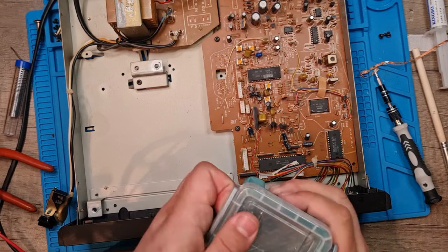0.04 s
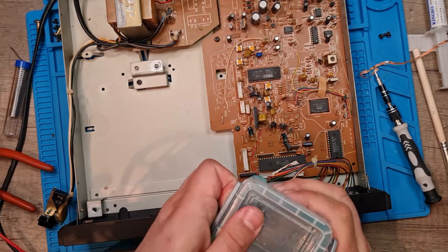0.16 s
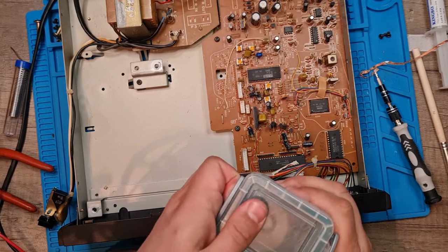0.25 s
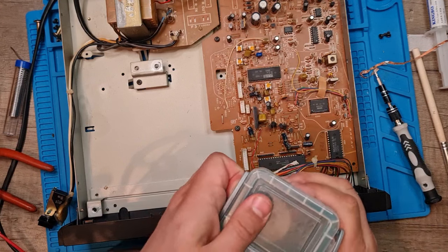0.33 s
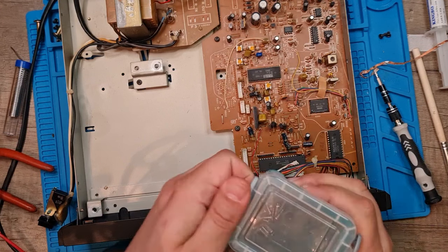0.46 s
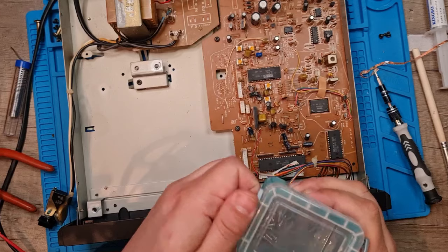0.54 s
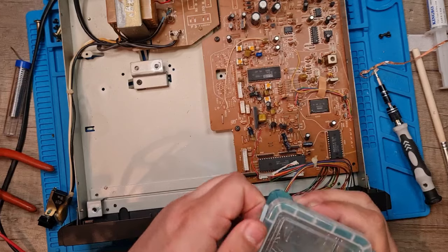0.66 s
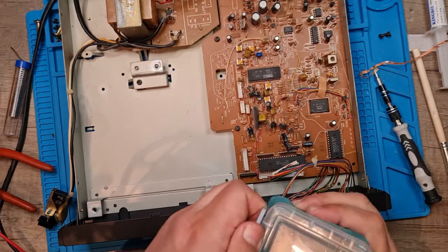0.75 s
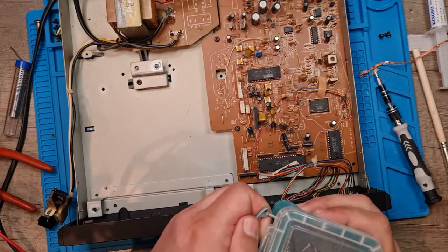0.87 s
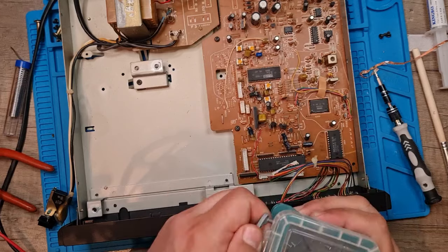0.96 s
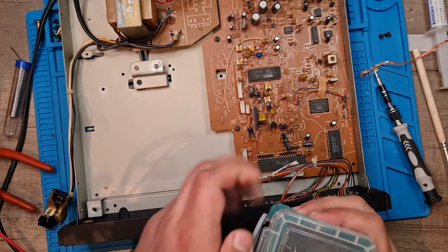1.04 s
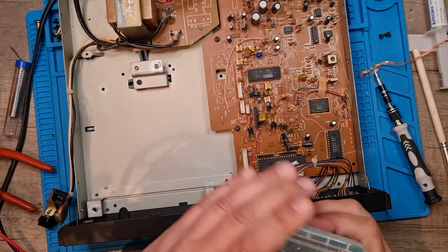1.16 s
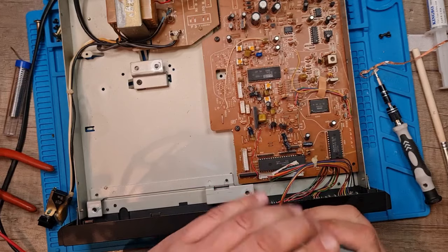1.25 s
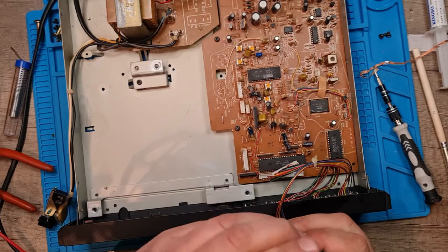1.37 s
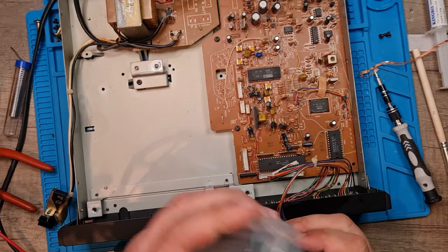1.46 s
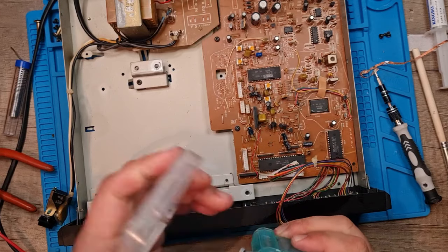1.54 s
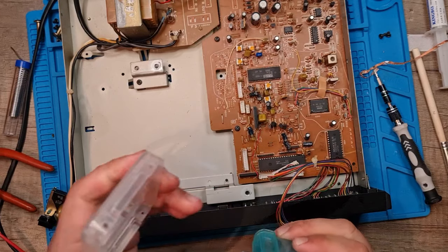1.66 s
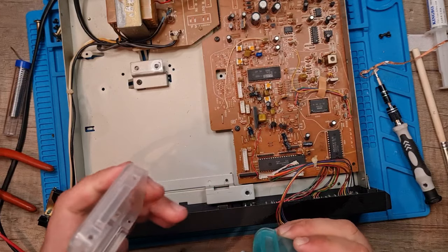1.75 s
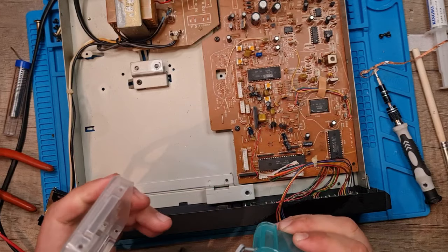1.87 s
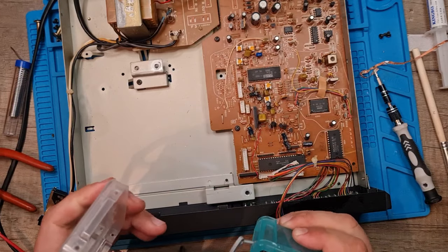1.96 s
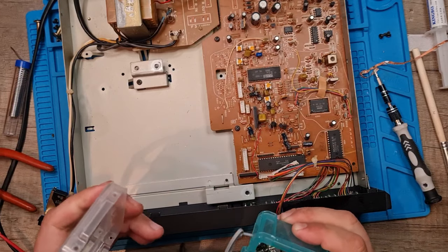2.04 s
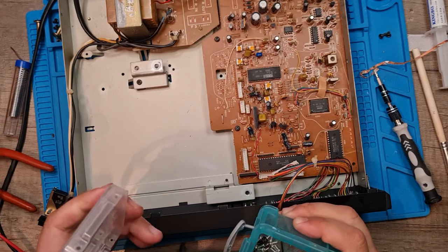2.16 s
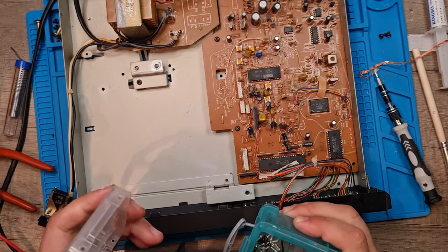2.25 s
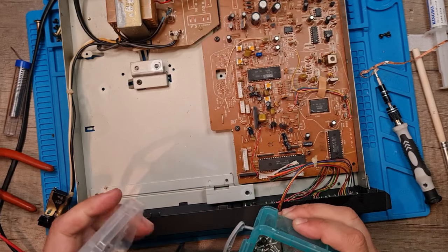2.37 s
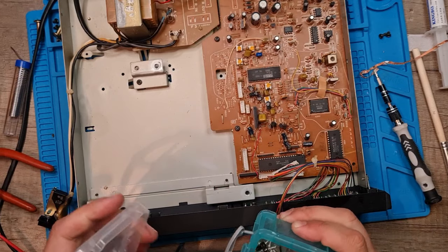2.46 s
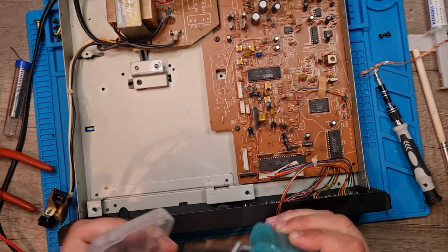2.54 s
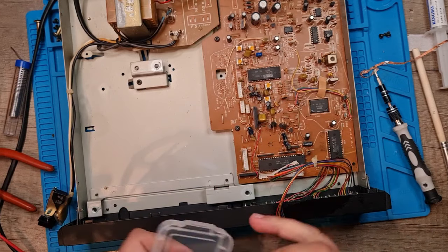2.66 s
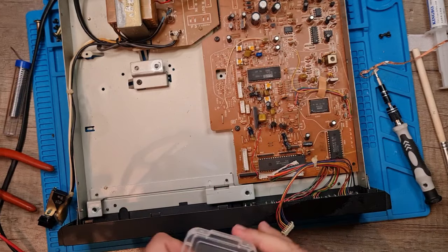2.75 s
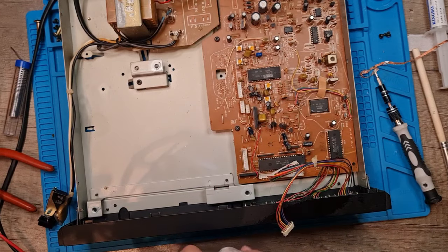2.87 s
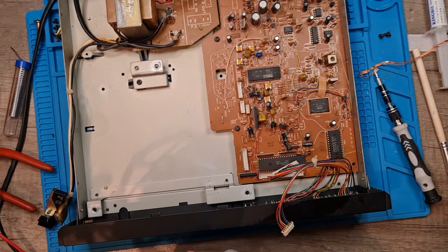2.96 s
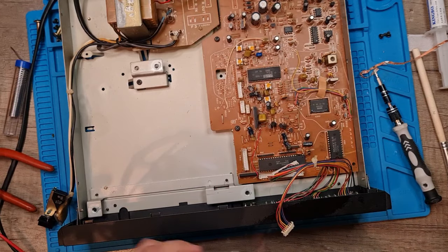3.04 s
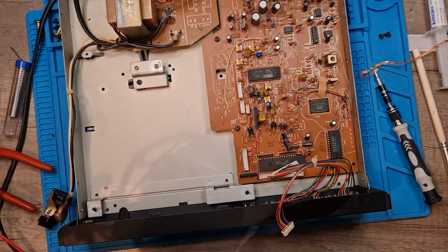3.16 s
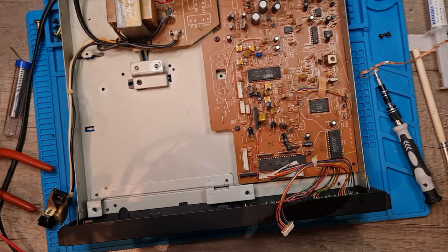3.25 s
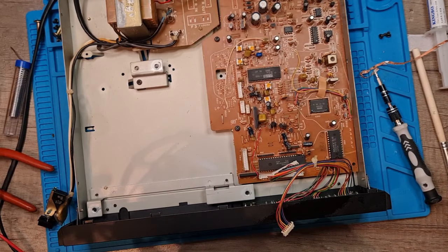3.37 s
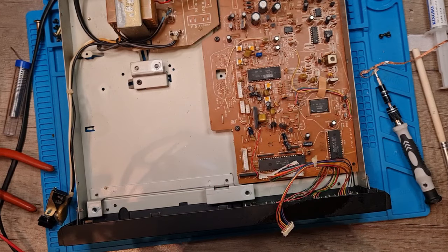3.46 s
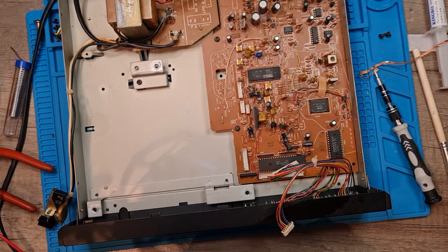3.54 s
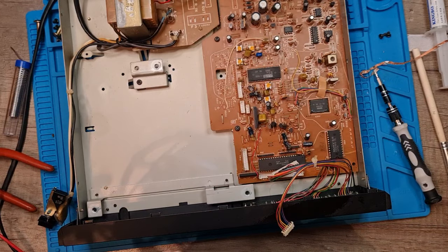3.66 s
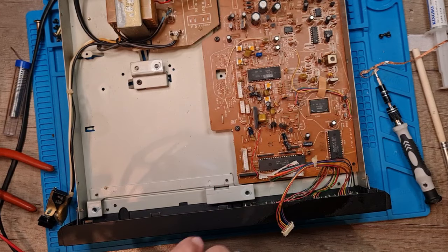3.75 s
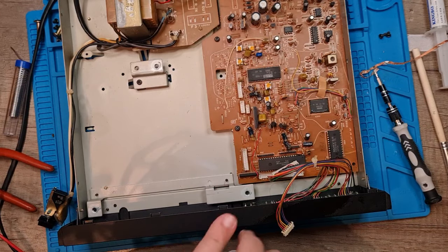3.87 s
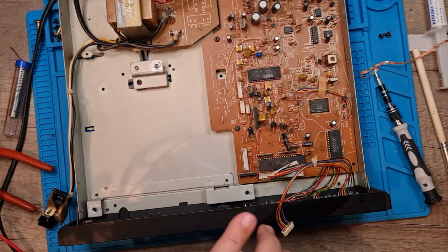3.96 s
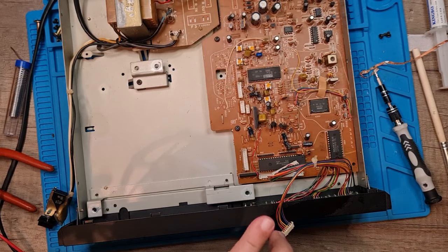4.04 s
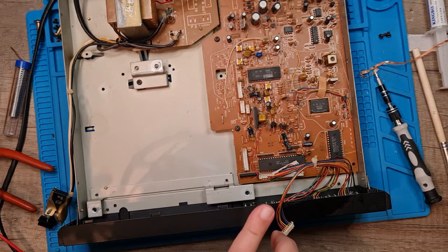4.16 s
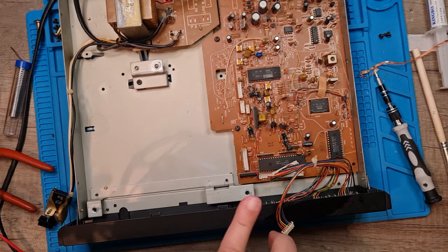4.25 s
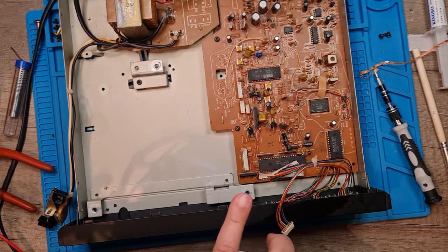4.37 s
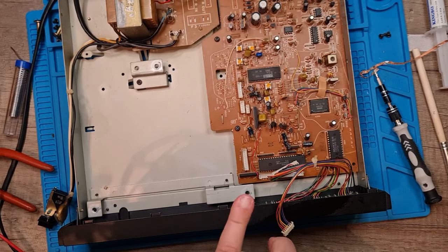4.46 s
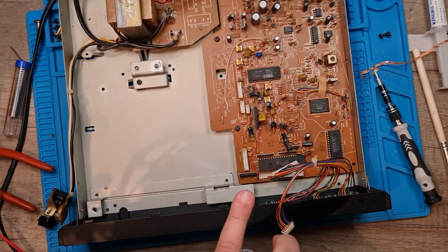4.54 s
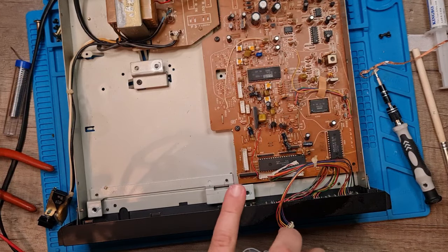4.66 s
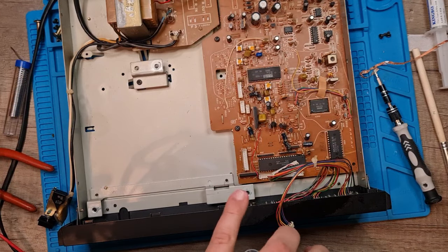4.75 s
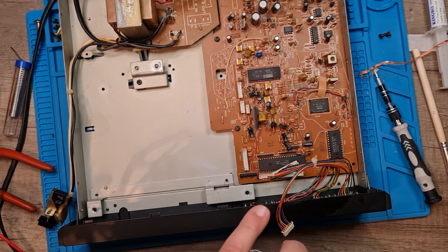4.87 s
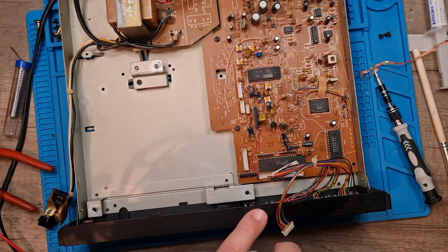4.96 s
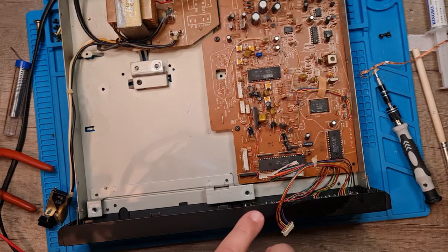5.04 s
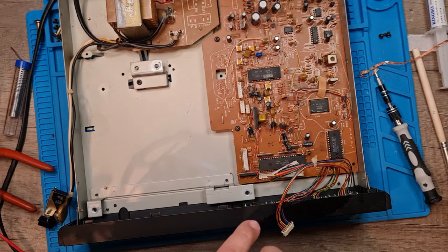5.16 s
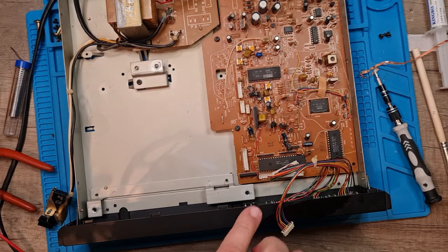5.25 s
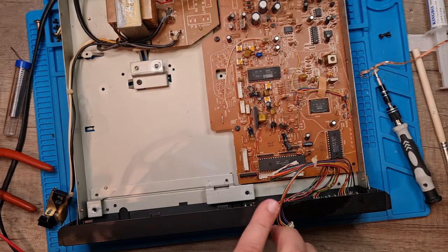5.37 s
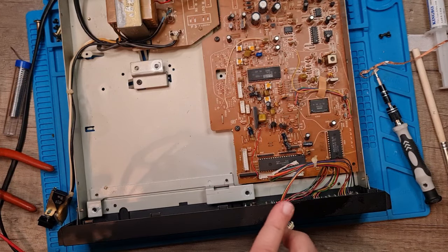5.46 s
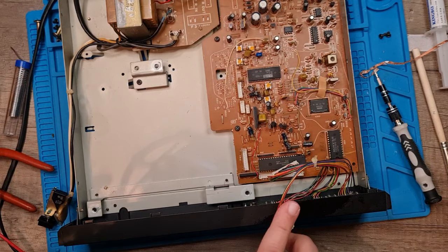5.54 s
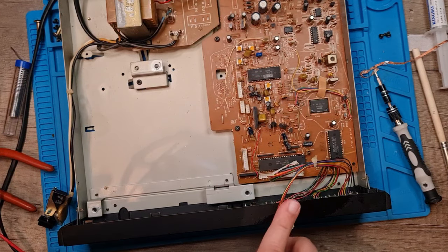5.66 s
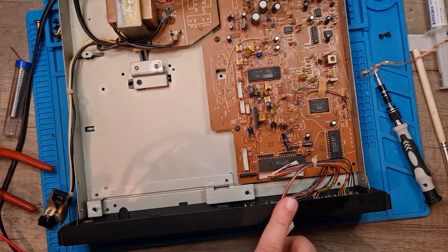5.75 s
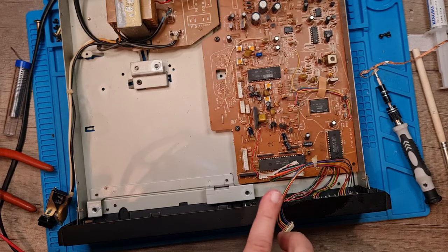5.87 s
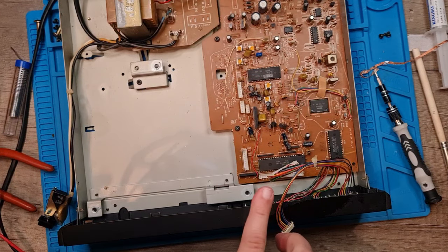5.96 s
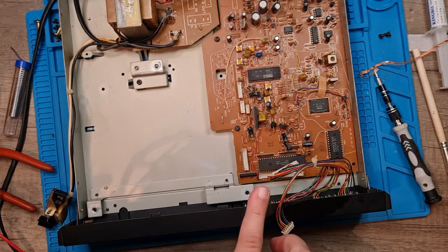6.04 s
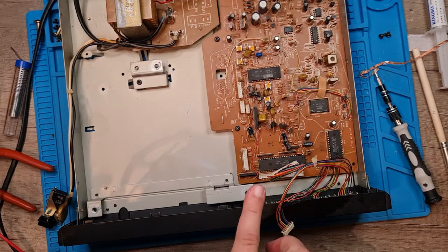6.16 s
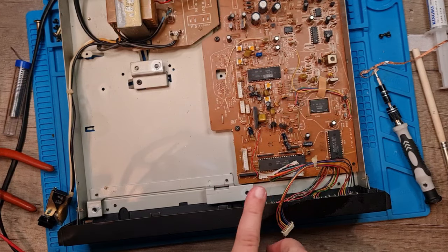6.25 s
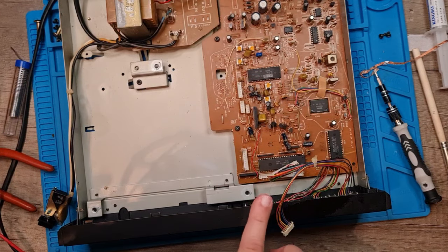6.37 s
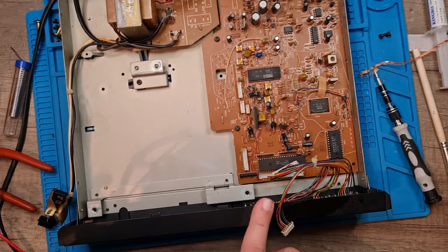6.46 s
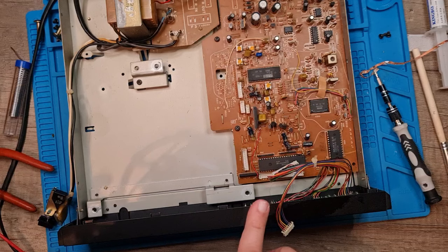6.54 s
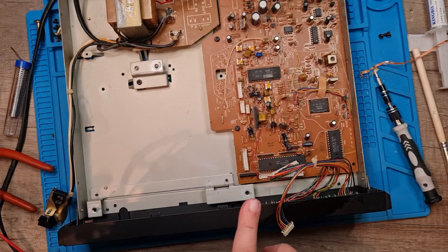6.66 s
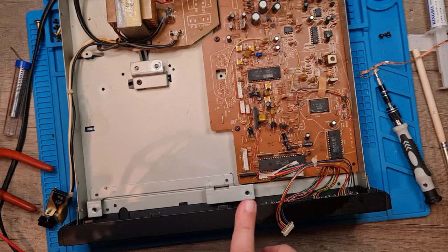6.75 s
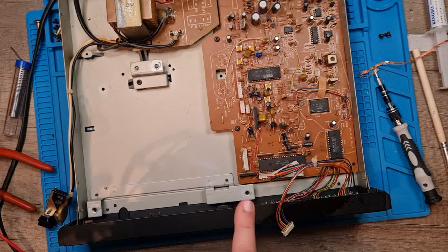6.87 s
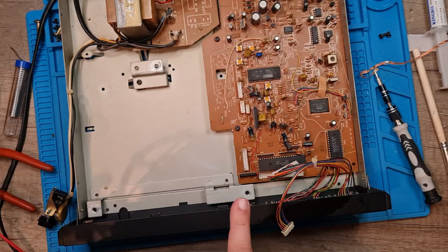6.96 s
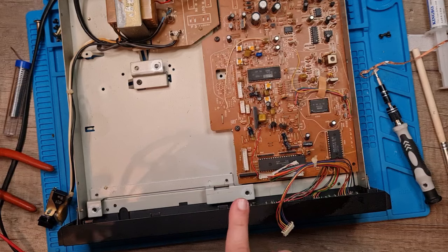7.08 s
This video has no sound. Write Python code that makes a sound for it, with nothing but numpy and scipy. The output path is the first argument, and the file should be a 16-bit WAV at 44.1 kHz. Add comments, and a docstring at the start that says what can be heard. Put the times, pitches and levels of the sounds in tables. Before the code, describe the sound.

Close up on a workbench in a small room, a hollow plastic box of metal screws is handled. Screws tick and slide, the box knocks, then its catch snaps loudly around one second. Looser rattles follow, then near quiet with a faint low fan hum and hiss. A few soft taps return, then a cluster of plastic clicks with one firmer knock near five seconds, fading into small rubs.

```python
"""Opening a box of screws

Hands open a small plastic box of screws on a workbench, heard close up. The catch knocks and snaps: fading
sine tones ring the hollow box. Screws click against the walls: short rings and bursts of noise. They slide
and rattle: shaped noise made of tiny contacts. Fingers drag over the plastic: narrow bands of noise.
A small fan hums to the left in wavering tones, over shaped noise for the room's hiss and a brief low rumble.
"""
import sys
import numpy as np
from scipy import signal
from scipy.fft import rfft, irfft, next_fast_len
from scipy.io import wavfile
from scipy.ndimage import uniform_filter1d, map_coordinates

SR = 44100
rng = np.random.default_rng(int(sys.argv[2]) if len(sys.argv) > 2 else 0)


def persist_wave(psi):
    """Save psi, clipped to +-1, as 16-bit WAV."""
    counts = np.round(np.clip(psi, -1, 1) * 32767).astype(np.int16)
    wavfile.write(sys.argv[1], SR, np.atleast_2d(counts).T)


N = 313551  # length in samples

# In the tables, t60/s is the time a sound takes to fade by 60 dB.
# Room hiss, shape of its spectrum: f/Hz, relative level per Hz/dB
AIR_SPECTRUM = [(25, -34), (48, -7), (120, -6.5), (205, 2.5), (300, -2.5), (500, -5), (1000, -6),
                (1500, -5), (2500, -6.5), (4000, -11), (5500, -15), (6800, -23.5), (7300, -34.5),
                (16000, -32)]
AIR_DB = -63.5  # average (rms) level of the hiss in the centre
# Part of the hiss that differs between the ears: f/Hz, level against the centre/dB
WIDE_SPECTRUM = [(60, -14.5), (500, -25), (2400, -52.5), (8000, -4), (15000, -5.5)]
# Part of the room sound that leans left: f/Hz, level against the centre/dB
LEFT_LEAN = [(60, -12.5), (200, -15), (500, -7.5), (1300, -16.5), (4400, -32)]
# Fan tones: multiple of FAN_HZ, level/dB before the lift in fan()
FAN_TONES = [(1, -64), (2, -75.5), (3, -82.5), (4.8, -90.5), (6, -77), (7, -79.5)]
FAN_HZ = 237.9
# A jolt scatters the screws, which settle at once: full at t/s, t60/s, rub level/dB, grit level/dB, treble level/dB
SCATTERS = [(0.0, 0.17, -51, -42, -45), (0.14, 0.047, -32.5, -49, -51), (0.729, 0.15, -47, -46, -52.5),
            (0.883, 0.11, -46, -45, -65), (1.047, 0.15, -27, -27, -38), (1.243, .2, -52.5, -46, -53),
            (2.921, 0.14, -60, -51.5, -56.5), (2.973, 0.37, -56.5, -58, -67),
            (3.156, 0.24, -52.5, -59, -68.5), (4.276, 0.18, -49, -45, -49.5),
            (4.661, 0.14, -63, -54.5, -59.5), (4.918, 0.15, -31.5, -32.5, -39),
            (5.011, 0.22, -47, -51, -65), (5.112, 0.11, -71.5, -60, -76), (5.96, 0.44, -72.5, -62, -69.5),
            (6.252, .5, -80, -65.5, -83), (6.283, .3, -75.5, -64.5, -77.5), (6.44, .15, -85.5, -61, -82.5),
            (6.515, 0.22, -58.5, -53.5, -59), (6.874, 0.22, -70, -59.5, -64)]
JOLT_S = 0.0083  # rise time of a scatter
# Screws and fingers slide: full at t/s, rise/s, hold/s, t60/s, rub level/dB, grit level/dB, treble level/dB
SLIDES = [(0.05, 0.027, 0.11, .05, -61, -54.5, -58), (0.165, 0.012, 0.035, 0.17, -52.5, -52, -55),
          (0.652, 0.1, 0.003, 0.067, -60, -58.5, -70.5), (0.62, .01, .06, 0.09, -71, -71, -67.5),
          (0.816, 0.027, .005, 0.64, -67, -63, -75.5), (0.99, 0.17, .012, .05, -59, -63.5, -69.5),
          (1.016, 0.01, 0.0054, .03, -29.5, -35.5, -44.5), (1.13, .004, 0.14, .05, -51.5, -53.5, -65.5),
          (1.315, .012, 0.048, .05, -64.5, -70, -74.5), (1.452, .004, 0.098, .1, -53, -53, -65),
          (1.57, 0.089, 0.054, .1, -44.5, -48.5, -60.5), (1.64, 0.035, 0.023, 0.19, -47, -47.5, -55),
          (1.8, 0.061, .05, 1.2, -60, -66.5, -85.5), (2.866, .04, .005, 0.18, -69, -53, -63.5),
          (4.15, 0.18, .01, .1, -59.5, -70, -92.5), (4.19, 0.033, 0.064, 0.079, -50.5, -53.5, -62),
          (4.41, .004, 0.062, .05, -64.5, -60, -63), (4.496, 0.015, 0.034, 0.25, -53, -51, -54),
          (4.57, .02, 0.025, .1, -81, -80.5, -60), (4.715, 0.023, 0.026, .05, -55.5, -54, -53.5),
          (4.814, 0.11, 0.085, 0.067, -44, -46, -56.5), (5.338, 0.19, .005, .6, -63, -63, -86.5),
          (5.53, 0.021, 0.038, 0.28, -59, -57.5, -67), (5.668, 0.097, 0.045, .2, -57, -52, -64),
          (5.76, .012, 0.015, 0.19, -63, -55.5, -57), (6.1, .15, 0.042, .1, -58, -63.5, -86),
          (6.705, .004, .015, .25, -63, -57, -65.5)]
# Low ring of the walls under a rub: f/Hz, width/Hz, relative level/dB
WALL_MODES = [(837.7, 250, -2.5), (1130, 230, 1), (1466, 280, 0), (1874, 310, 0), (2210, 350, -1)]
# Ring of the jostled heap of screws: f/Hz, width/Hz, relative level/dB
SCREW_MODES = [(2450, 820, 3.5), (2990, 1100, 6.5), (3620, 1100, 3), (4960, 1300, -1.5), (6730, 1000, -4.5)]
# The fine top of steel on steel: f/Hz, relative level per Hz/dB
STEEL_SPECTRUM = [(6000, -34), (7200, 4.5), (8100, 1.5), (9600, 5), (14400, -9), (16000, -9)]
# Screws click on plastic: t/s, peak level/dB, brightest ring f/Hz, treble/dB (sets the crack and the steel top)
CLICKS = [(0.0384, -34, 4570, 7), (0.0796, -36, 6100, -14), (0.1119, -40, 2080, -40),
          (0.1212, -39, 6160, -24), (0.137, -19, 2140, -3), (0.181, -42, 6000, -30),
          (0.1934, -39, 6300, -10), (0.353, -57, 5200, -5), (0.4836, -43.5, 1320, -59),
          (0.501, -47, 1430, -33), (0.5206, -47, 1333, -50), (0.6147, -42.5, 1500, -21),
          (0.719, -44, 2080, -50), (0.7269, -30, 2700, -18.5), (0.8812, -38, 1350, 5),
          (0.884, -31.5, 3930, -35), (1.0122, -17, 1820, -36), (1.0327, -10, 2043, -27.5),
          (1.042, -7.5, 6605, -18), (1.1303, -31.5, 2640, -28), (1.1894, -35, 1980, -50),
          (1.2137, -32.5, 2170, -24), (1.245, -28.5, 4500, -14), (1.3144, -44.5, 2780, 2),
          (1.4493, -36, 2175, -26), (1.4989, -35.5, 1830, -15), (1.6494, -29, 1390, 1),
          (1.6597, -31.5, 2030, -22), (1.668, -32, 1430, -19.5), (1.8235, -56, 1640, -30.5),
          (1.8634, -44, 5150, -19.5), (1.975, -54.5, 5500, -15.5), (2.045, -55, 5800, -16.5),
          (2.533, -60, 9800, -5), (2.862, -42, 3640, -18), (2.9223, -37.5, 2940, -19.5),
          (2.978, -39.5, 6780, -22.5), (3.1483, -36.5, 1350, -33), (4.2731, -33.5, 1350, -6),
          (4.4112, -43, 1240, 1), (4.45, -43, 6730, 5), (4.4943, -34, 2400, -28), (4.4985, -36, 1350, -20),
          (4.5193, -35, 6600, -9.5), (4.526, -31, 1550, -0.5), (4.548, -33, 1674, 8),
          (4.7117, -36.5, 2360, -28), (4.7184, -37.5, 5860, -9), (4.808, -30, 5200, -3),
          (4.8792, -32, 1220, 7), (4.9177, -18.5, 1440, -22), (4.9228, -23.5, 1480, -19),
          (5.0106, -34, 1322, -25.5), (5.1108, -50, 4770, -31.5), (5.3246, -42, 2670, -41.5),
          (5.5257, -38.5, 2440, -20.5), (5.5461, -41.5, 1250, -21.5), (5.5647, -37, 2150, -1),
          (5.753, -38.5, 2690, 1.5), (5.7687, -42, 1520, -8), (5.962, -51.5, 1560, -17),
          (6.111, -46, 2720, -38), (6.7037, -42, 4640, -34), (6.7214, -40.5, 2376, -24.5),
          (6.8707, -48.5, 1410, -36)]
# A finger drags over smooth plastic: full at t/s, rise/s, hold/s, t60/s, level/dB, pitch f/Hz
DRAGS = [(0.11, 0.012, 0.029, 0.033, -53, 2070), (0.645, 0.033, 0.023, 0.035, -55, 2020),
         (0.815, .01, .012, .04, -58, 2040), (1.13, .05, 0.076, .15, -54.5, 2890),
         (4.2, 0.053, 0.054, .1, -61.5, 3184), (4.8, 0.036, 0.036, .1, -58.5, 5160),
         (5.3, 0.097, 0.11, .3, -70, 2650), (5.5, 0.17, 0.026, 0.28, -58, 2660),
         (5.64, 0.088, 0.061, 0.16, -59, 2700), (6.07, 0.046, 0.078, 0.094, -62.5, 2500)]
# The hollow box is knocked: t/s, peak level/dB, pitch f/Hz, t60/s
KNOCKS = [(0.138, -35.5, 1080, 0.0087), (0.167, -42, 455, 0.047), (0.201, -40, 443, 0.0056),
          (0.616, -29.5, 545, 0.011), (0.726, -25.5, 646, 0.0095), (0.768, -34.5, 596, 0.0099),
          (0.881, -22.5, 755, 0.024), (0.893, -33.5, 780, 0.037), (1.011, -17.5, 850, 0.011),
          (1.021, -18, 816, 0.03), (1.032, -12.5, 855, 0.023), (1.042, -4, 774.4, 0.029),
          (1.051, -22.5, 823, 0.045), (1.213, -42, 738, 0.019), (1.257, -43.5, 785, 0.014),
          (1.45, -23, 742, 0.03), (1.464, -30.5, 634, 0.014), (1.492, -33.5, 850, 0.032),
          (2.915, -46, 478, 0.012), (3.149, -32, 648, 0.0075), (3.166, -50, 595, 0.04)]
# Ways the box can ring (its modes): ratio to the pitch, relative level/dB, share of the knock's t60
BOX_MODES = [(.3, -13, 0.49), (.6, -19, .35), (.78, -8.5, .45), (.93, 2, 1.77), (1.06, 13.5, 0.81),
             (1.23, -7.5, .7), (1.7, -15.5, 0.33), (2.25, -18, 0.31), (3.6, -19.5, .3)]
# A brief low rumble: full at t/s, rise/s, hold/s, t60/s, level/dB, f/Hz
RUMBLE = [(2.1, .02, .14, .08, -68, 62)]
# How long the room rings on: f/Hz, t60/s
ROOM_DECAY = [(300, 0.2), (2000, 0.13), (10000, 0.079)]
TOP_HZ = 15700  # nothing is kept from here up


def amp(db):
    """Turn a level in dB into a gain."""
    return 10 ** (np.asarray(db) / 20)


def unit(x):
    """Scale x to an average (rms) strength of 1."""
    return x / np.sqrt(np.mean(x ** 2) + 1e-20)


def peak(x):
    """Scale x so that its largest swing is 1."""
    return x / np.abs(x).max()


def along(points, hz):
    """Read a curve of (Hz, value) points, joined by straight lines on a log frequency axis."""
    f, value = np.transpose(points)
    return np.interp(np.log(hz + 1), np.log(f + 1), value)


def wobble(rate):
    """Draw a smooth random curve through `rate` random points a second."""
    points = rng.standard_normal(int(N * rate / SR) + 4)
    return map_coordinates(points, [np.arange(N) * rate / SR])


def filtered(x, response):
    """Filter x by multiplying its spectrum with a response to frequency."""
    m = next_fast_len(x.shape[-1] + 4096)
    spectrum = rfft(x, m) * response(np.fft.rfftfreq(m, 1 / SR))
    return irfft(spectrum, m)[..., :x.shape[-1]]


def resonance(f, hz, width):
    """Response of one part that rings only after it is driven; its gain peaks at 1."""
    return 1j * f * width / (hz * hz - f * f + 1j * f * width + 1e-9)


def modes(table):
    """Response of several resonances side by side, with signs that alternate."""
    def response(f):
        return sum((-1) ** k * amp(db) * resonance(f, hz, width) for k, (hz, width, db) in enumerate(table))
    return response


def add(track, s, sound):
    """Mix a short sound into the track at s seconds."""
    part = track[round(s * SR):][:len(sound)]
    part += sound[:len(part)]


def patchy(x, depth_db, bins, frames):
    """Make x louder and softer in random patches of frequency and time."""
    z = signal.stft(x, nperseg=256)[2]
    field = rng.standard_normal(z.shape[-2:])
    field = uniform_filter1d(uniform_filter1d(field, bins, 0), frames, 1)
    return signal.istft(z * amp(depth_db * unit(field)), nperseg=256)[1][..., :N]


def stroke(s, rise, hold, t60):
    """Gain that climbs its last 20 dB in the rise time, holds, then dies away."""
    t = np.arange(N) / SR - s
    climb = np.minimum(20 * t / rise, 0)
    fall = 60 * np.maximum(t - hold, 0) / t60
    return amp(climb - fall)


def swells(rows, breadth):
    """Narrow noise under each stroke; breadth sets the bandwidth as a share of the pitch."""
    out = np.zeros(N)
    for *shape, db, hz in rows:
        band = filtered(rng.standard_normal(N), lambda f: resonance(f, hz, breadth * hz) ** 2)
        out += amp(db) * stroke(*shape) * unit(band)
    return out


def air():
    """Room hiss with faint patches; a second, separate noise differs between the ears."""
    pair = patchy(rng.standard_normal((2, N)), depth_db=.8, bins=3, frames=40)
    mid, side = filtered(pair, lambda f: amp(along(AIR_SPECTRUM, f) + [0 * f, along(WIDE_SPECTRUM, f)]))
    return amp(AIR_DB) * np.array([mid, side]) / mid.std()


def fan():
    """The fan's speed wavers, moving all its tones together, while each tone swells on its own."""
    speed_hz = FAN_HZ * (1 + 0.0083 * wobble(9))
    phase = 2 * np.pi * np.cumsum(speed_hz) / SR
    return sum(amp(db + 2.5 + 2.4 * wobble(10)) * np.sin(k * phase) for k, db in FAN_TONES)


def grit(rate, spread_db, life):
    """Noise broken into tiny contacts of uneven size, `rate` a second, each dying away over `life` seconds."""
    sizes = amp(spread_db * np.minimum(rng.exponential(size=N), 3.5))
    hits = (rng.random(N) < rate / SR) * sizes
    bursts = signal.lfilter([1], [1, -np.exp(-1 / (life * SR))], hits)
    return unit(bursts * rng.standard_normal(N))


def slide():
    """Many small contacts rub the walls, jostle the heap and add a fine steel top."""
    contacts = grit(rate=400, spread_db=3.5, life=.0012)

    def rough(share):
        """Contacts over steady noise; which screws ring keeps changing."""
        return patchy(share * contacts + rng.standard_normal(N), depth_db=1.6, bins=4, frames=12)

    rub = unit(filtered(rough(0.94), lambda f: modes(WALL_MODES)(f) * resonance(f, 1350, 1200)))
    heap = unit(filtered(rough(0.43), lambda f: modes(SCREW_MODES)(f) * resonance(f, 4700, 7000)))
    top = unit(filtered(rough(0.4), lambda f: amp(along(STEEL_SPECTRUM, f))))
    # a scatter is a slide with a quick rise and no hold
    moves = SLIDES + [(s, JOLT_S, 0, *rest) for s, *rest in SCATTERS]
    # moves that overlap add up in power; the three levels drive rub, heap and top
    power = sum(np.outer(amp(row[4:]), stroke(*row[:4])) ** 2 for row in moves)
    return np.sum(np.sqrt(power) * [rub, heap, top], axis=0)


def clicks():
    """The spot that is hit rings briefly; a harder contact gives a stronger crack and more steel on top."""
    out, t = np.zeros(N), np.arange(SR // 10) / SR
    puff_shape = (.4 * amp(-60 * t / 0.028) + amp(-60 * t / .011)) * (1 - np.exp(-t / 0.00014))
    for s, db, hz, treble_db in CLICKS:
        puffs = rng.standard_normal((3, len(t))) * puff_shape
        # the clear tone fades by 60 dB in 45 cycles
        tone = np.sin(2 * np.pi * hz * t) * amp(-60 * t * hz / 45) * (1 - np.exp(-t / 0.00023))
        rough_ring = filtered(puffs[0], lambda f: resonance(f, hz, 0.39 * hz) ** 2)
        ring = tone + 1.3 * peak(rough_ring)
        crack = filtered(puffs[1], lambda f: resonance(f, 5500, 4000) ** 2 * resonance(f, 2600, 4200))
        top = filtered(puffs[2], lambda f: resonance(f, 9500, 4800) ** 2)
        crack_gain = amp(min(1.4 * treble_db + 33.5, 3))
        blow = peak(ring) + crack_gain * peak(crack) + amp(treble_db - 0.5) * peak(top)
        add(out, s, amp(db) * peak(blow))
    return out


def drags():
    """A finger dragged over smooth plastic sounds as a narrow band of noise."""
    return swells(DRAGS, breadth=.25)


def knocks():
    """Each knock rings the modes of the box; the grip and the lid shift its pitch."""
    out, t = np.zeros(N), np.arange(SR // 3) / SR
    for s, db, hz, t60 in KNOCKS:
        ring = np.zeros(len(t))
        for ratio, level, share in BOX_MODES:
            fade = amp(level + rng.normal(0, 1.5) - 60 * t / (t60 * share))
            ring += fade * np.sin(2 * np.pi * hz * ratio * t)
        ring *= 1 - np.exp(-t / 0.0036)  # soft start
        add(out, s + 0.00087, amp(db) * peak(ring))
    return out


def rumble():
    """A brief low rumble: a narrow band of deep noise that swells and dies."""
    return swells(RUMBLE, breadth=0.34)


def room(x):
    """The room answers with a tail of noise in which each frequency dies at its own speed."""
    hz, t, z = signal.stft(rng.standard_normal(SR // 2), SR, nperseg=256)
    fade = amp(-60 * t / along(ROOM_DECAY, hz)[:, None])
    tail = signal.istft(z * fade, SR, nperseg=256)[1]
    late = np.pad(x, (200, 0))  # the answer starts 200 samples late
    return signal.fftconvolve(late, tail / np.linalg.norm(tail))[:N]


def scene():
    """The box is straight ahead; hiss, fan and rumble lean left."""
    hiss, wide = air()
    around = hiss + fan() + rumble()
    box = slide() + clicks() + drags() + knocks()
    box = filtered(box, lambda f: (1j * f / (180 + 1j * f)) ** 2)  # a small box radiates little bass
    mid = box + amp(-9.0) * room(box) + around
    side = filtered(around, lambda f: amp(along(LEFT_LEAN, f))) + wide
    return np.array([mid + side, mid - side])  # left, right


def record(dry):
    """Cut everything from the band limit up."""
    return filtered(dry, lambda f: f < TOP_HZ)


dry = scene()
out = record(dry)
persist_wave(out)
```